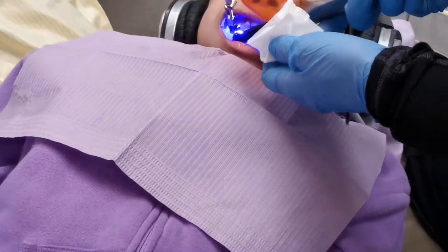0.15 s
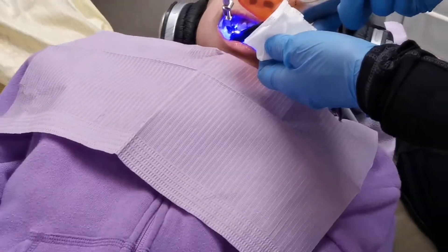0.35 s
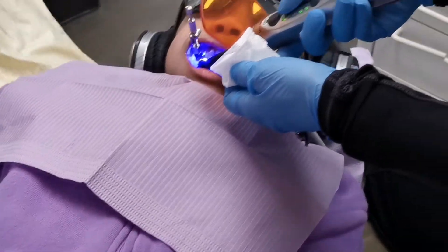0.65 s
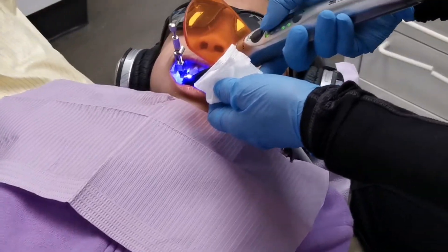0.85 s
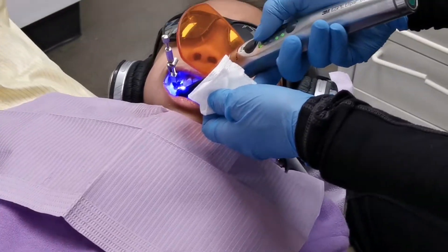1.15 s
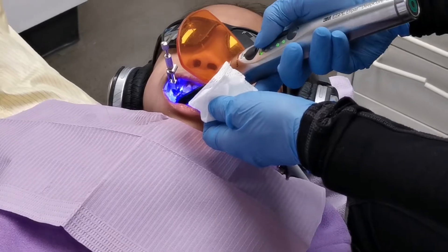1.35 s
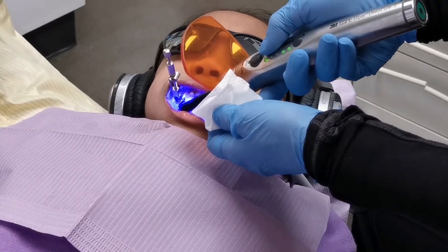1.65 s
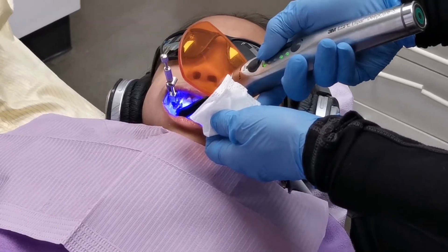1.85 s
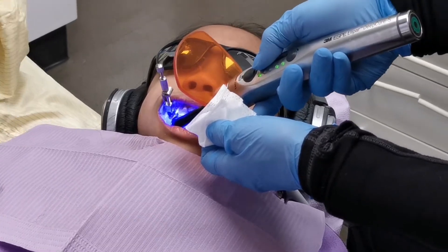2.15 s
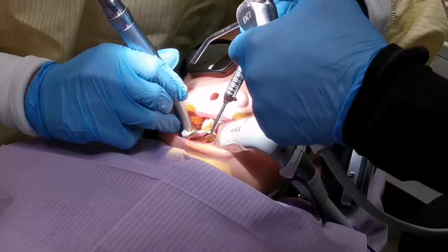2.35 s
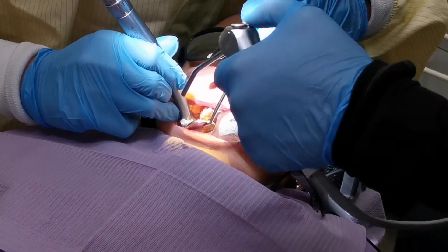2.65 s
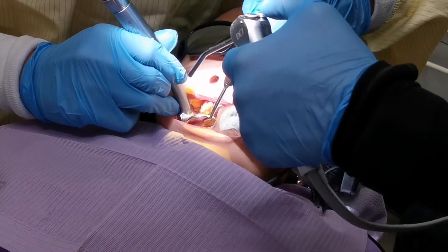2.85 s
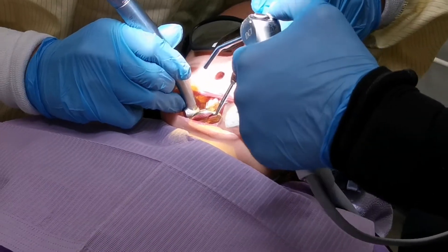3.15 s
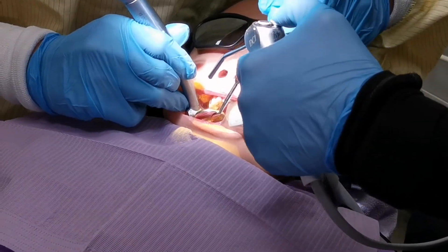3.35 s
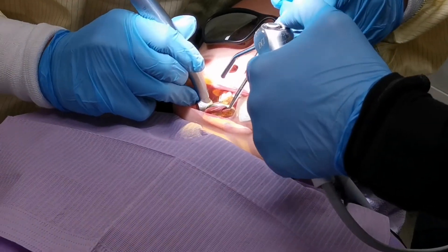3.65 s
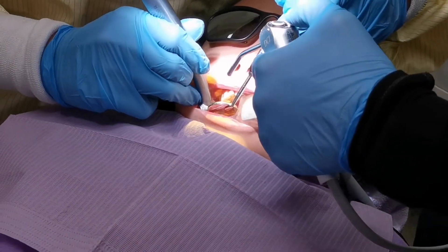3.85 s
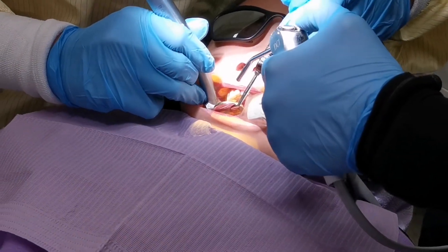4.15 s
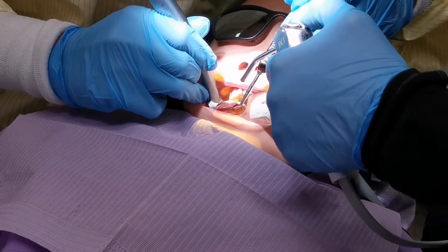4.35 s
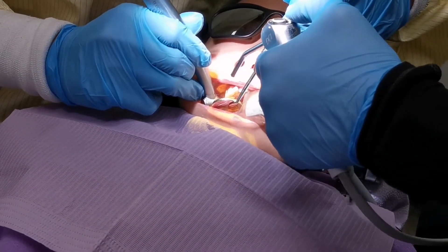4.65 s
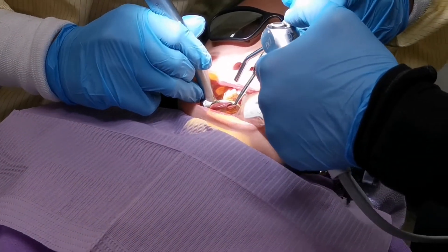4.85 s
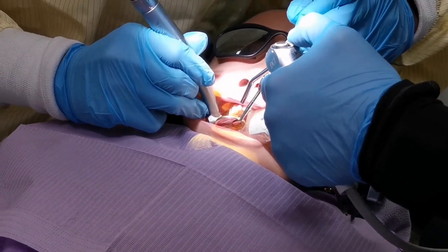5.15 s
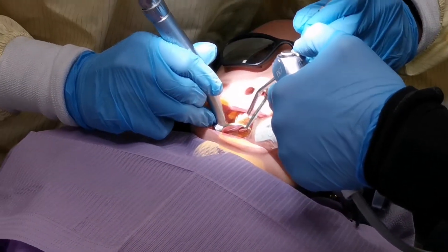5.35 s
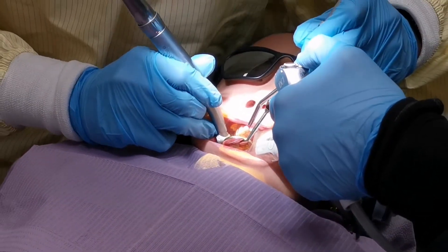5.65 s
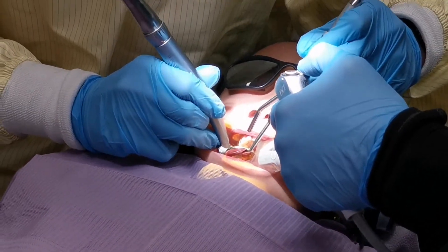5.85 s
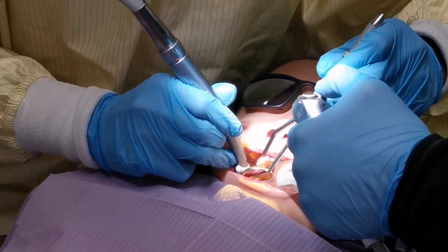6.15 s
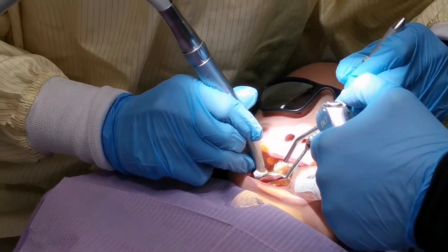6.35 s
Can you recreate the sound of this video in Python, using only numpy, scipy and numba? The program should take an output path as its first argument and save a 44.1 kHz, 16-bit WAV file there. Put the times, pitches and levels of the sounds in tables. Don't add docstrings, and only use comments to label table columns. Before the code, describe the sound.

A dental suction tip sucks air in a steady hollow rush with thin hiss, sliding whistles and a few soft knocks in a low-humming treatment room.

```python
import sys
import numpy as np
from scipy import signal
from scipy.fft import rfft, irfft, next_fast_len
from scipy.io import wavfile
from scipy.ndimage import uniform_filter1d
from numba import njit

SR = 44100
rng = np.random.default_rng(int(sys.argv[2]) if len(sys.argv) > 2 else 0)


def decibels_to_gain(level_db):
    exponent = np.asarray(level_db, float) / 20
    return 10 ** exponent


def wrap_up_sound(samples):
    columns = np.atleast_2d(samples).T
    tamed = np.clip(columns, -1, 1)
    steps = np.round(tamed * 32767).astype(np.int16)
    wavfile.write(sys.argv[1], SR, steps)


N = 287355
T = np.arange(N) / SR

SCENE_CHANGES = [2.069, 3.582, 5.464, 5.886]

CAVITY_MODES = [
    [(.75, 272, -8.5, -10, 0.53, 0), (.87, 295, -9.5, -2.5, 0.34, 0), (1.12, 447, -11, 5, 0.13, 0)],
    [(.78, 340, -15.5, -9, 0.72, 0), (.93, 260, -11.5, -2, 0.77, 0), (1.12, 405, -8.5, -1, .9, 0)],
]
TIP_MODES = [
    [(.86, 510, -35, -3, 1, 0), (1.03, 510, -38.5, 0, 0.67, .05), (1.25, 630, -24.5, -13.5, 0.76, .1)],
    [(.86, 540, -17, 0.2, 0.42, 0), (1.01, 555, -13, 4, 0.96, .05), (1.2, 478, -46, 0.6, .7, .1)],
]
SECOND_TIP_MODES = [
    [(.86, 700, -36, -3.5, 0.57, 0.12), (.98, 436, -57, -1, 0.99, 0.23), (1.07, 314, -56, -5.5, 0.45, 0.21)],
    [(.76, 540, -27, -14, 0.99, 0.16), (.89, 616, -51, -5, 0.98, 0.17), (1.01, 447, -45.5, -2, .85, 0.2112), (1.1, 322, -51, -10.5, 0.65, 0.17)],
]
RIM_MODES = [
    [(7760, 1000, -30, -0.15, 0.77, .23), (8170, 1200, -12, -0.87, 0.52, 0.238)],
    [(7950, 620, -13.5, 3.5, 0.55, .23), (8395, 900, -20, 1.5, 0.57, .23)],
]
# same columns, pitch_hz
JET_LOW_BANDS = [
    [(5840, 2000, -6.5, -2, 0.72, 0.13), (7000, 510, -6.5, 0.5, 0.23, 0.21)],
    [(5787, 1150, -5.5, -6, 0.36, 0.15), (6800, 4700, -8.5, -3.5, 0.97, 0.19)],
]
JET_MIDDLE_BANDS = [
    [(9251, 880, -0.65, 1, 0.63, .23), (9810, 1100, -1.14, 1, 0.35, 0.21)],
    [(9350, 1900, -1, 0, 0.85, .23), (9980, 860, -1.2, 0.31, 0.953, 0.2373)],
]
JET_HIGH_BANDS = [
    [(10900, 1300, -4, 0, .8, .23), (11900, 1600, -8, -7, .7, .23)],
    [(10850, 1000, -1, -1, .8, .23), (11650, 1100, -1, -3, .7, .23), (12400, 1200, -1, -4, .7, .23)],
]
JET_TOP_BANDS = [
    [(12700, 1800, 0, 0, .7, .23), (14700, 1500, -9, -9, .7, .23), (15750, 1500, 4, 4, .7, .23)],
    [(13450, 1800, -1, -2, .7, .23), (14500, 1500, -7, -9, .6, .23), (15350, 1500, -6, -8, .6, .23)],
]

# time_s, flow_db, mouth_opening_db, edge_hiss_db, depth_percent (pitch shift)
HAND_MOVES = [
    [(.05, -0.5, 3, -2, 2.5), (.6, -1.5, 1.5, 1, 2), (.95, -1.3, 0.5, 1, 0), (1.45, .5, -2, 0, -1),
     (2.0, 0.7, -1.3, 0, -1.5)],
    [(2.1, 0.6, 1, 2, 1.54), (2.55, -0.9, -1.1, -0.5, -0.34), (3.5, 2, 1.6, -2, -.5)],
    [(3.65, -0.55, 0, -1, -0.55), (4.8, 0.36, .5, -0.5, -0.25), (5.05, -0.5, 1.5, 1.5, 0.41),
     (5.4, -1.3, 0.76, 4.5, 0.59)],
    [(5.5, -2.5, 1, 1.5, 0.35), (5.85, 0.2, 1.3, -.5, 0.22)],
    [(5.93, -2, -2.5, 0.5, 0.72), (6.22, 1.2, -0.3, 2.5, 0.11), (6.28, -1.5, 3.5, 0.5, -0.065),
     (6.48, -0.3, 5, -0.5, -0.72)],
]
# cavity_db, tip_db, second_tip_db, rim_db
SUCTION_LEVELS = [
    (-41, -38, -35, -48),
    (-45.5, -34, -33.5, -46.5),
    (-35, -29, -31, -45),
    (-42, -32, -28.5, -37.6),
    (-38.5, -32, -34, -41),
]
# cavity_hz, tip_hz, second_tip_hz
SUCTION_PITCHES = [(1633, 2359, 4438), (1674, 2574, 4320), (1684, 2550, 4413), (1706, 2610, 4167),
                   (1697, 2464, 4460)]
SUCTION_PER_FLOW = (1.1, 1.03, 1.03, .1)
PITCH_PER_DEPTH = (1.49, 1, 1.5)
# cavity_db, tip_db, second_tip_db, rim_db
RESONANCE_SHARES = (1.4, 0.52, -0.21, -0.13)
HOSE_RETURNS = (0.27, 0.22)

# low_db, middle_db, high_db, top_db
JET_LEVELS = [
    (-50, -42.5, -48.5, -54),
    (-41.5, -45, -47.5, -49.5),
    (-43, -44.5, -46.5, -46),
    (-44.5, -43.5, -46.5, -47),
    (-47.5, -47.5, -46, -48),
]
JET_PER_FLOW = (0.52, 0.244, 0.79, 0.58)
JET_PER_MOUTH = (-.35, 0.46, -0.16, -0.79)
JET_PER_EDGE = (0.15, -0.22, 0.25, -0.069)

# time_s, pitch_hz, level_db
WHISTLE_GLIDES = [
    [(2.64, 3540, -40), (2.7, 3930, -32), (2.75, 4230, -35), (2.79, 4400, -48), (2.82, 4380, -42),
     (2.9, 4620, -38), (2.98, 4950, -43), (3.1, 5170, -47)],
    [(5.0, 5300, -40), (5.06, 4880, -35), (5.1, 4620, -33), (5.15, 4540, -33), (5.2, 4600, -42),
     (5.27, 4900, -46), (5.34, 5150, -45), (5.4, 4880, -46), (5.45, 4700, -51)],
    [(4.46, 700, -69), (4.55, 690, -65), (4.63, 665, -64), (4.68, 600, -68), (4.75, 490, -72)],
    [(5.5, 5100, -50), (5.55, 5200, -45.5), (5.62, 4900, -45), (5.69, 4700, -50), (5.76, 4950, -48),
     (5.83, 5180, -48), (5.88, 5150, -51)],
]
# time_s, pitch_hz, level_db
GAP_GLIDES = [
    [(2.08, 1000, -58), (2.5, 1230, -57), (2.9, 1250, -55)],
    [(5.48, 4100, -42), (5.62, 3980, -40), (5.74, 4240, -38), (5.88, 3900, -41)],
    [(5.47, 5060, -42), (5.88, 5100, -43)],
    [(6.04, 2600, -45), (6.12, 2430, -34), (6.19, 2230, -32.5), (6.235, 2090, -31), (6.27, 1900, -39)],
    [(5.9, 11800, -51), (6.1, 12020, -44), (6.24, 11970, -48), (6.27, 11500, -60)],
    [(2.08, 6200, -50), (2.5, 6250, -45), (2.95, 6200, -54)],
    [(1.88, 4300, -48), (1.98, 3900, -42), (2.065, 3600, -41)],
    [(5.9, 7000, -52), (6.2, 7100, -49), (6.5, 6900, -51)],
    [(.42, 1850, -49), (.55, 1760, -41.5), (.75, 1680, -47)],
]
# width_hz, left_db, right_db, likeness_0_1, right_lag_ms
GAP_FORMS = [(300, -6, 0, .8, 0), (480, -18, 0, .8, .2), (900, 0, -3, .7, .2), (480, -11, 0, .9, 0),
             (800, 0, -6, .8, .23), (800, -6, 0, .7, .2), (450, -20, 0, .8, .2), (700, -4, 0, .7, .2),
             (220, -12, 0, .8, 0)]
# start_s, pitch_hz, t60_s, left_db, right_db
KNOCKS = [
    (2.006, 78, 0.08, -52, -27.5),
    (2.175, 815, 0.07, -45, -38),
    (2.185, 650, 0.05, -47, -40),
    (2.18, 480, 0.06, -47, -41),
]

# pitch_hz, width_hz, left_db, right_db, likeness_0_1, right_lag_ms
HUM_MODES = [(122.4, 44, -9, -3, 0.85, 0), (160.3, 21.4, 0.5, -1, 1, 0), (197.2, 21, -2, -1, 0.89, 0),
             (232.4, 21, -5.5, -0.5, 1, 0), (282.6, 65, -3.5, -4.5, 0.82, 0)]
MURMUR_MODES = [(407, 270, -7, -5, 0.91, 0), (700, 400, -11.5, -9, 0.55, 0),
                (1003, 183, -6.5, -6.5, 0.57, 0)]
RUMBLE_MODES = [(30, 25, -0.5, 0, 0.29, 0), (74, 58, 1.5, 0, 0.93, 0)]
# hum_db, distant_air_db
ROOM_LEVELS = [
    (-55, -56.5),
    (-56, -59),
    (-56, -60),
    (-64, -63),
    (-59.5, -61),
]
# centre_s, length_s, hum_db, distant_air_db
ROOM_SWELLS = [
    (.5, 0.085, 1, 2),
    (1.0, 0.22, 5, -1.5),
    (1.25, 0.19, -1.5, 6.5),
    (3.45, .14, 6, -1.5),
    (3.976, 0.091, 3.5, -2),
    (5.907, 0.081, -1, -1),
    (6.12, 0.048, 1.5, -1),
    (6.493, 0.2, .3, 7.5),
]

# pitch_hz, width_hz, depth_0_1
LEFT_PORT_DIPS = [(2740, 790, .98), (4620, 320, .5), (7860, 700, 0.5)]
RIGHT_PORT_DIPS = [(3360, 61, 0.23), (5430, 500, 0.52), (10420, 460, 0.3)]
UPPER_LIMITS = 15480, 15150


def suction():
    flow, mouth, edge, depth = columns(HAND_MOVES)
    cavity_db, tip_db, second_db, rim_db = per_shot(SUCTION_LEVELS) + np.outer(SUCTION_PER_FLOW, flow)
    cavity_db, rim_db = cavity_db + mouth, rim_db + edge
    pitch_shift = 1 + np.outer(PITCH_PER_DEPTH, depth) / 100
    cavity_hz, tip_hz, second_hz = per_shot(SUCTION_PITCHES) * pitch_shift
    cavity_gain, tip_gain, second_gain, rim_gain = decibels_to_gain(np.array(RESONANCE_SHARES))
    air = rng.standard_normal((2, N))

    cavity = cavity_gain * moved(CAVITY_MODES, cavity_db, cavity_hz, flicker_db=1.33, air=air)
    tip = tip_gain * moved(TIP_MODES, tip_db, tip_hz, flicker_db=1.17, air=air)
    second = second_gain * moved(SECOND_TIP_MODES, second_db, second_hz, flicker_db=0.25, air=air)
    rim = rim_gain * moved(RIM_MODES, rim_db, flicker_db=0.7)
    low = cavity - tip
    at_lip, inside = (hose(low, echo) for echo in HOSE_RETURNS)
    return np.where(T < SCENE_CHANGES[0], at_lip, inside) + second + rim


def hose(x, echo):
    spacing_hz = 136.25
    size = next_fast_len(N + SR)
    turns = np.arange(size // 2 + 1) * SR / size / spacing_hz
    response = np.sqrt(1 - echo ** 2) / (1 - echo * np.exp(-2j * np.pi * turns))
    return irfft(rfft(x, size) * response, size)[:, :N]


def jet():
    flow, mouth, edge, _ = columns(HAND_MOVES)
    levels = per_shot(JET_LEVELS) + np.outer(JET_PER_FLOW, flow)
    levels += np.outer(JET_PER_MOUTH, mouth) + np.outer(JET_PER_EDGE, edge)
    bands = (JET_LOW_BANDS, JET_MIDDLE_BANDS, JET_HIGH_BANDS, JET_TOP_BANDS)
    return sum(moved(modes, db, flicker_db=1.13) for modes, db in zip(bands, levels))


def whistles():
    out = np.zeros((2, N))
    for table, left_db in zip(WHISTLE_GLIDES, (-24, -30, 15.0, -24)):
        s, hz, db = np.transpose(table)
        gate = np.clip(np.minimum(T - s[0], s[-1] - T) / 0.028, 0, 1)
        wavering_hz = np.interp(T, s, hz) * (1 + 0.00217 * walk(60))
        phase = 2 * np.pi * np.cumsum(wavering_hz) / SR
        tone = gate * decibels_to_gain(np.interp(T, s, db) + 1.5 * walk(40)) * np.sin(phase)
        out += tone * decibels_to_gain(np.array([[left_db], [0]]) + 8.5) / (1 + decibels_to_gain(left_db))
    return out


def gap_rings():
    out = np.zeros((2, N))
    for table, form in zip(GAP_GLIDES, GAP_FORMS):
        s, hz, db = np.transpose(table)
        part = slice(int(s[0] * SR), int(s[-1] * SR))
        out += ring([(1, *form)], np.interp(T, s, db), np.interp(T, s, hz), flicker_db=2.0, part=part)
    return out


def knocks():
    push_s = 0.0043
    out = np.zeros((2, N))
    for s, hz, t60, left_db, right_db in KNOCKS:
        t = np.clip(T - s, 0, None)
        envelope = (1 - np.exp(-t / push_s)) * np.exp(-np.log(1000) * t / t60)
        out += envelope * np.sin(2 * np.pi * hz * t) * decibels_to_gain(np.array([[left_db], [right_db]]))
    return out


def room():
    swell = sum(np.outer(db, np.exp(-((T - s) / length) ** 2)) for s, length, *db in ROOM_SWELLS)
    hum_db, murmur_db = per_shot(ROOM_LEVELS) + swell
    rumble_db = -67 + 0.5 * (hum_db - hum_db.mean())
    hum = ring(HUM_MODES, hum_db, flicker_db=2.5)
    murmur = ring(MURMUR_MODES, murmur_db, flicker_db=-3.0)
    return hum + murmur + ring(RUMBLE_MODES, rumble_db, flicker_db=3.0)


def moved(positions, db, pitch_hz=0.97, flicker_db=1., air=None):
    change = int(SCENE_CHANGES[0] * SR)
    parts = slice(0, change), slice(change, N)
    return sum(ring(modes, db, pitch_hz, flicker_db, part, air) for modes, part in zip(positions, parts))


def ring(modes, db, pitch_hz=0.995, flicker_db=1., part=slice(0, N), air=None):
    out = np.zeros((2, N))
    air = rng.standard_normal((2, N)) if air is None else air
    for k, (hz, width_hz, left_db, right_db, like, lag_ms) in enumerate(modes):
        centre_hz = (hz * pitch_hz + 0 * T)[part]
        shared, own = (resonance(x[part], centre_hz, width_hz) for x in air)
        late = np.roll(shared, int(round(lag_ms * SR / 1000)))
        right = like * late + np.sqrt(1 - like ** 2) * own
        unsteady = (-1) ** k * decibels_to_gain(flicker_db * walk(9))[part] / np.sqrt(width_hz)
        out[:, part] += unsteady * np.array([decibels_to_gain(left_db) * shared, decibels_to_gain(right_db) * right])
    return out * decibels_to_gain(db) / np.std(out[:, part].mean(axis=0))


def resonance(x, hz, width_hz):
    hz = np.clip(hz + 0 * x, 10, .45 * SR)
    g, k = np.tan(np.pi * hz / SR), width_hz / hz
    return svf(svf(x, g, k), g, k)


@njit
def svf(x, g, k):
    y, band, low = np.empty(len(x)), 0., 0.
    for i in range(len(x)):
        v = (band + g[i] * (x[i] - low)) / (1 + g[i] * (g[i] + k[i]))
        band, low = 2 * v - band, low + 2 * g[i] * v
        y[i] = k[i] * v
    return y


def walk(rate):
    k = int(SR / rate)
    held = np.repeat(rng.standard_normal(N // k + 1), k)
    return 1.21 * uniform_filter1d(uniform_filter1d(held, k), k)[:N]


def columns(shots):
    shot = np.searchsorted(SCENE_CHANGES, T)
    tables = [np.transpose(rows) for rows in shots]
    return [np.choose(shot, [np.interp(T, table[0], table[c]) for table in tables])
            for c in range(1, len(tables[0]))]


def per_shot(rows):
    return np.transpose(rows)[:, np.searchsorted(SCENE_CHANGES, T)]


def scene():
    return suction() + jet() + whistles() + gap_rings() + knocks() + room()


def low_pass(x):
    return signal.sosfilt(signal.butter(12, 15720, fs=SR, output="sos"), x)


def record(dry):
    ports = dry.copy()
    for port, dips in enumerate((LEFT_PORT_DIPS, RIGHT_PORT_DIPS)):
        for hz, width_hz, depth in dips:
            ports[port] -= depth * resonance(ports[port], hz, 2 * width_hz)
    wide, narrow = (signal.sosfilt(signal.ellip(8, .3, 60, hz, fs=SR, output="sos"), ports)
                    for hz in UPPER_LIMITS)
    mix = np.where(T < SCENE_CHANGES[0], wide, narrow)
    return low_pass(mix)


dry = scene()
out = record(dry)
wrap_up_sound(out)
```